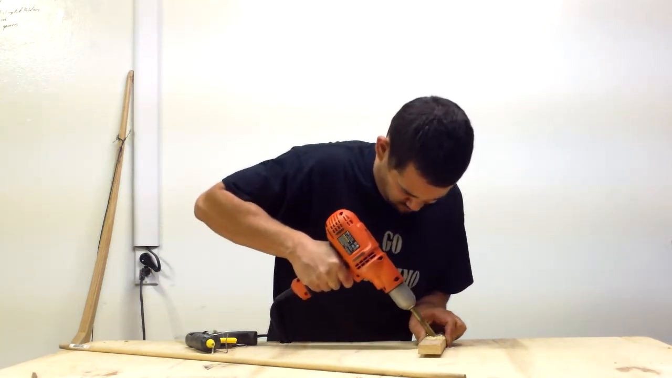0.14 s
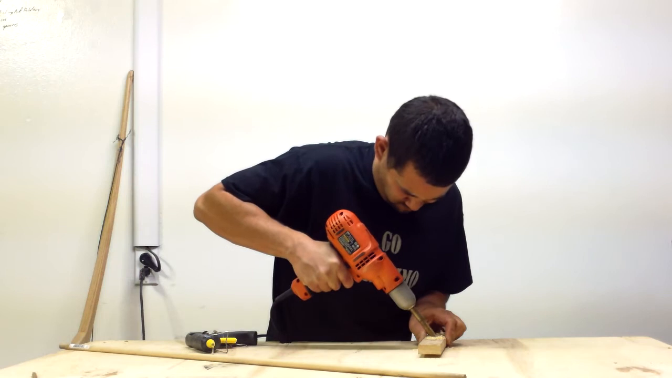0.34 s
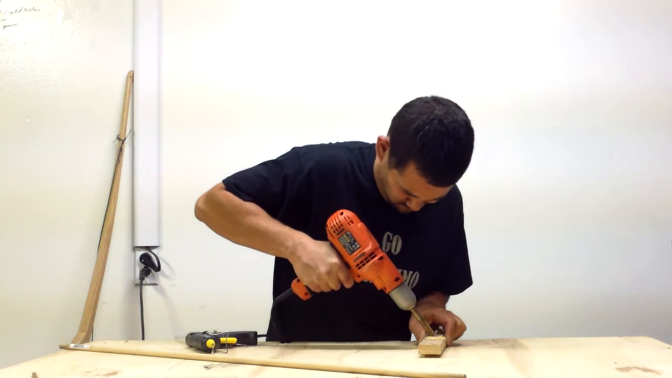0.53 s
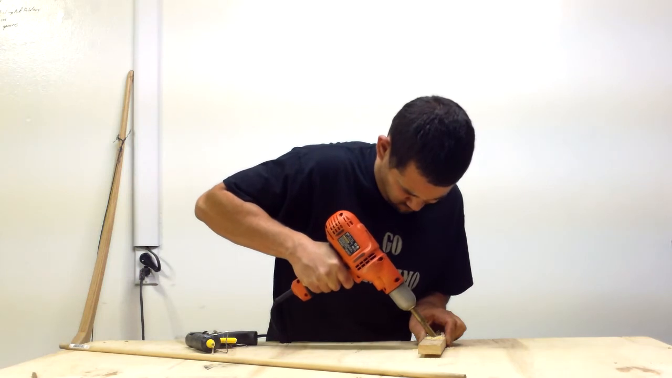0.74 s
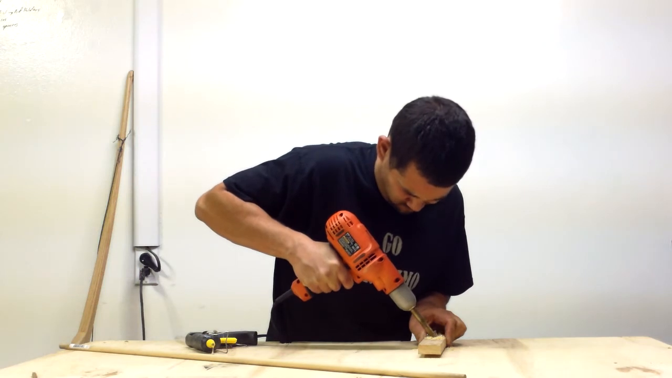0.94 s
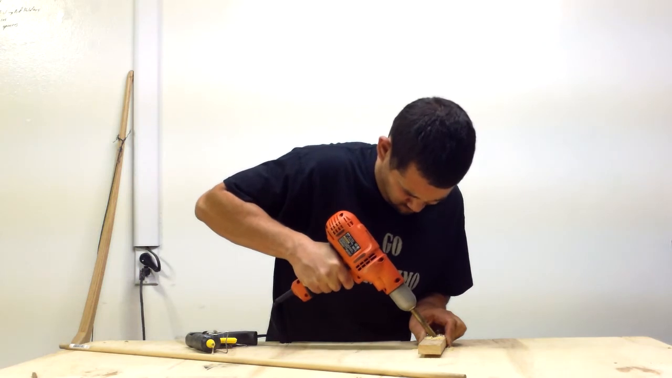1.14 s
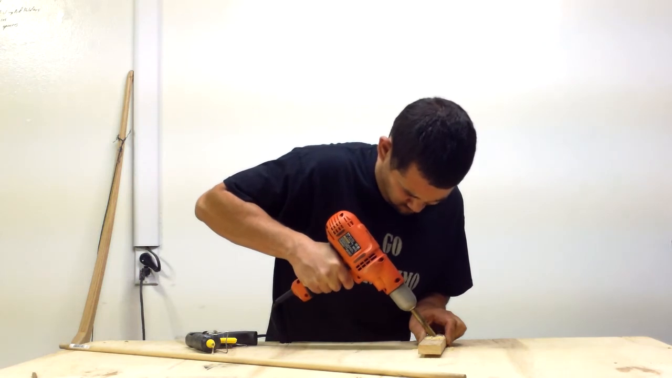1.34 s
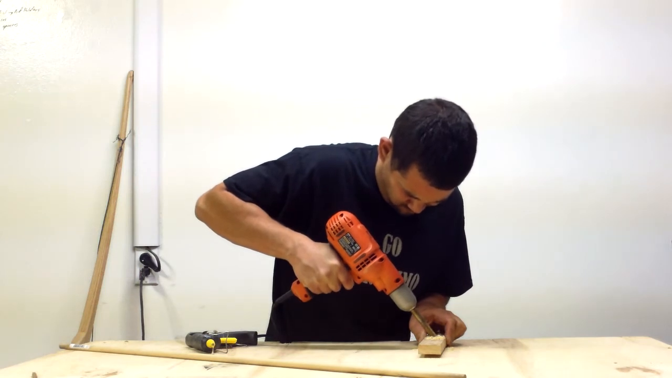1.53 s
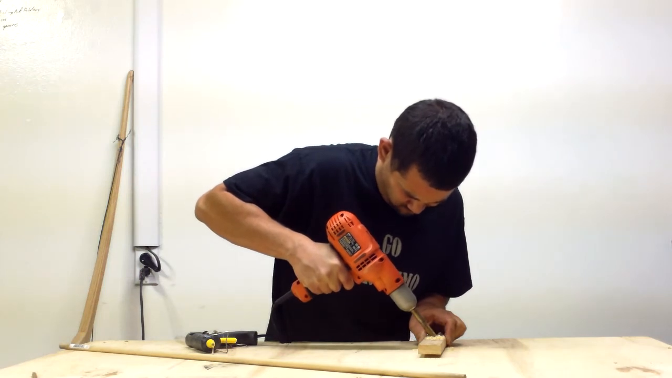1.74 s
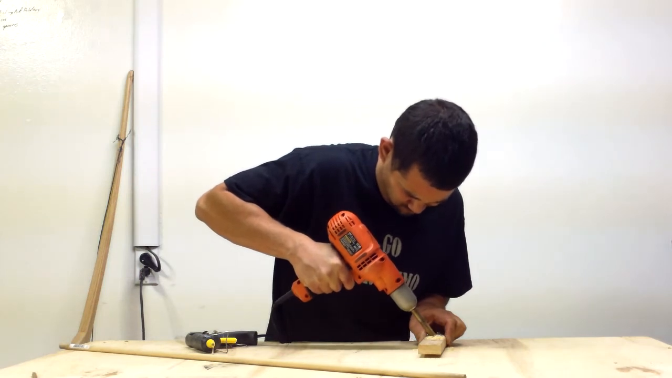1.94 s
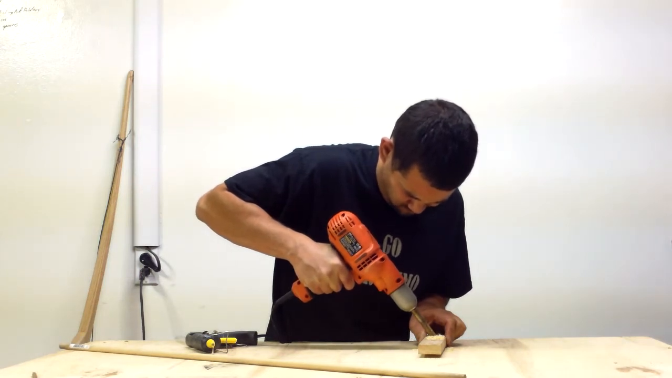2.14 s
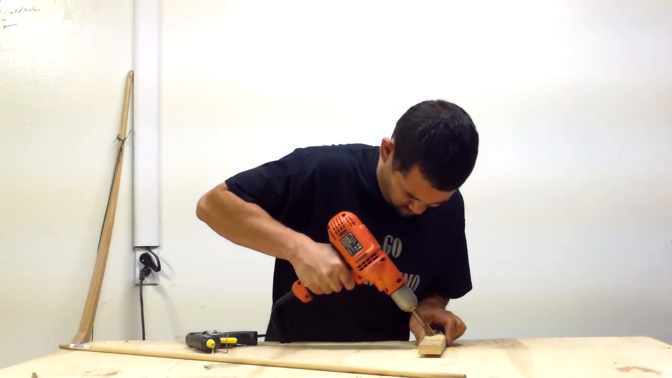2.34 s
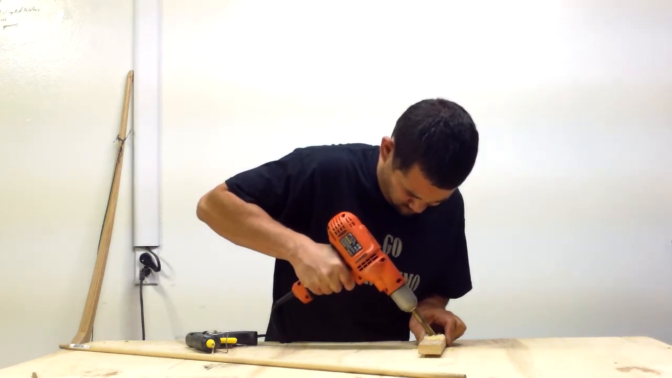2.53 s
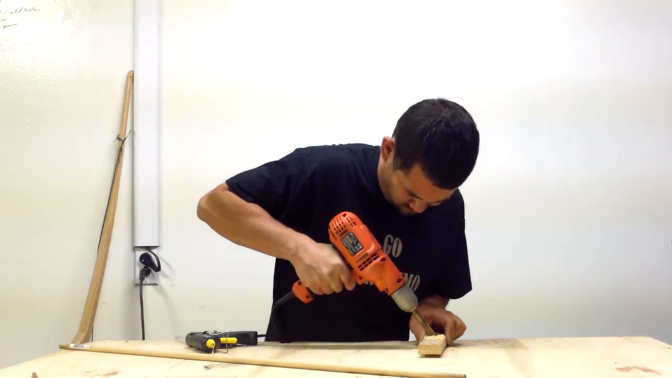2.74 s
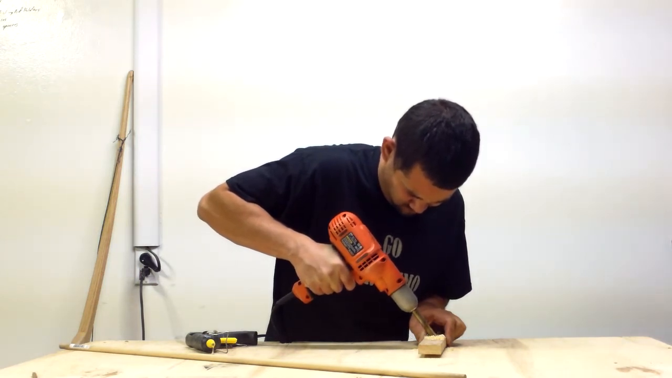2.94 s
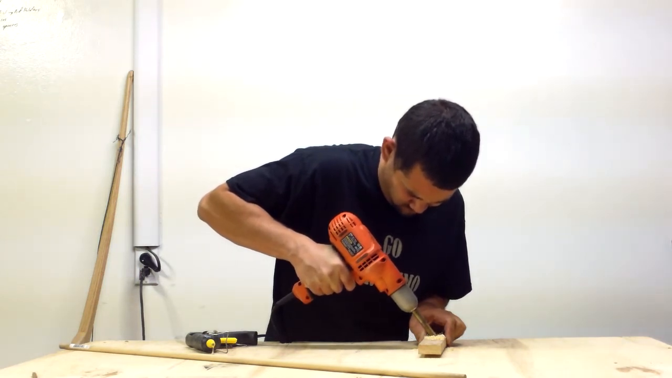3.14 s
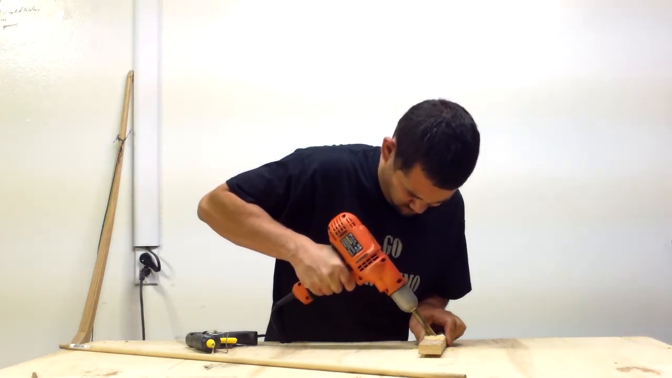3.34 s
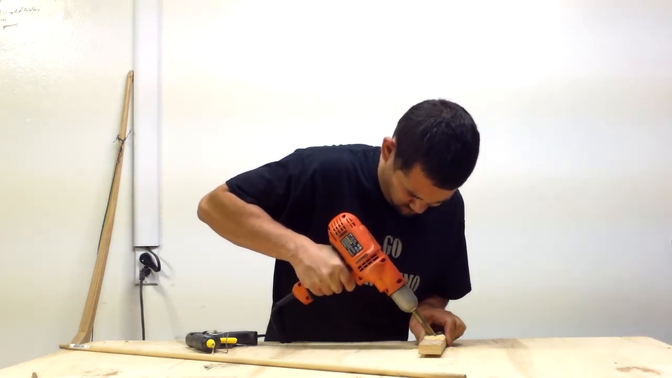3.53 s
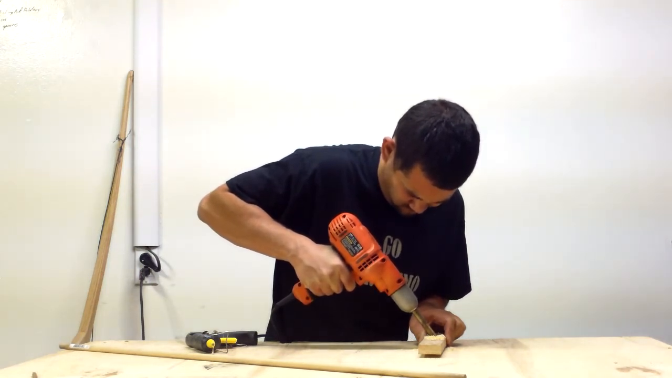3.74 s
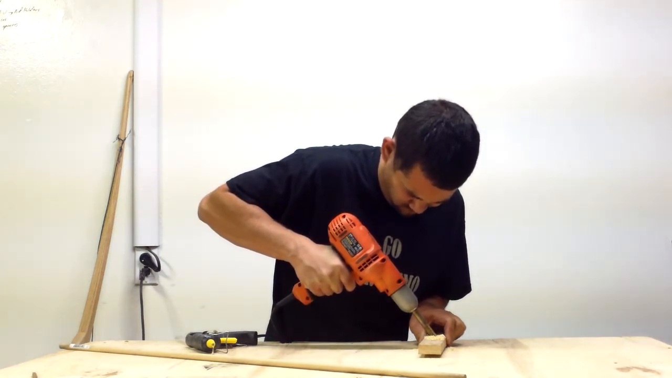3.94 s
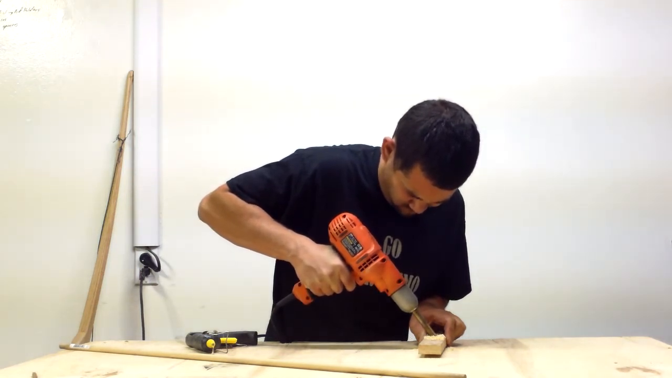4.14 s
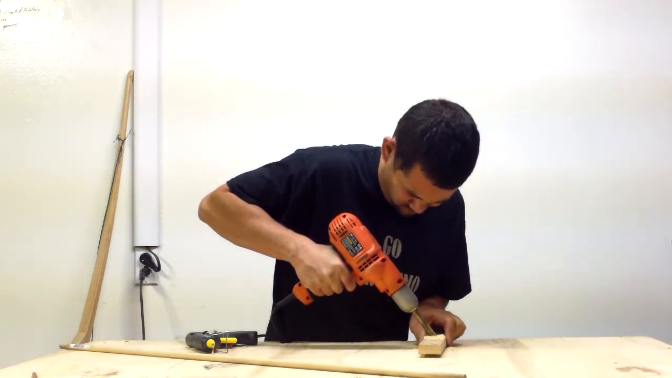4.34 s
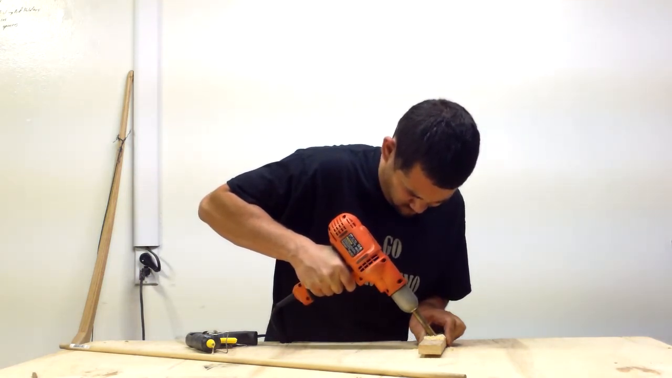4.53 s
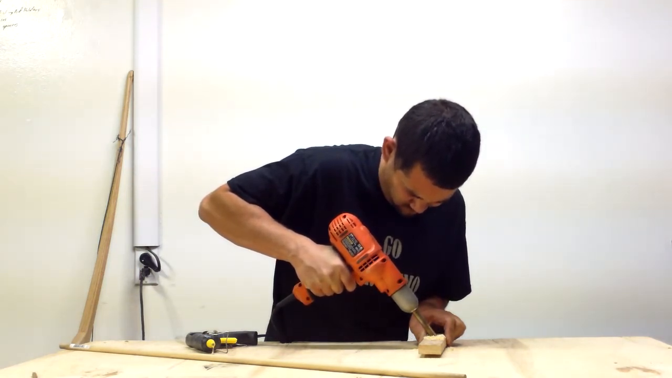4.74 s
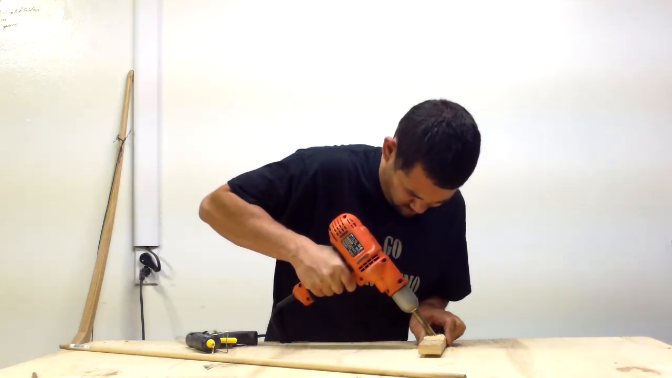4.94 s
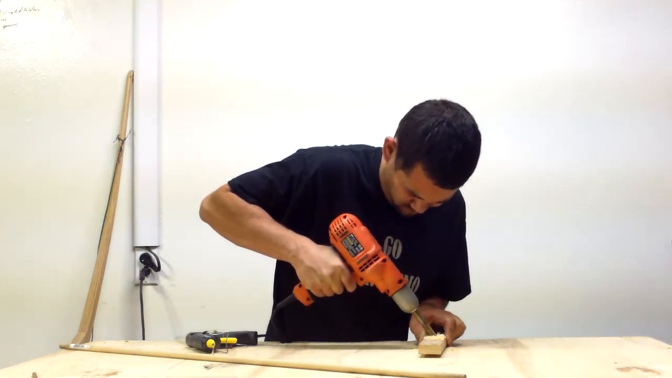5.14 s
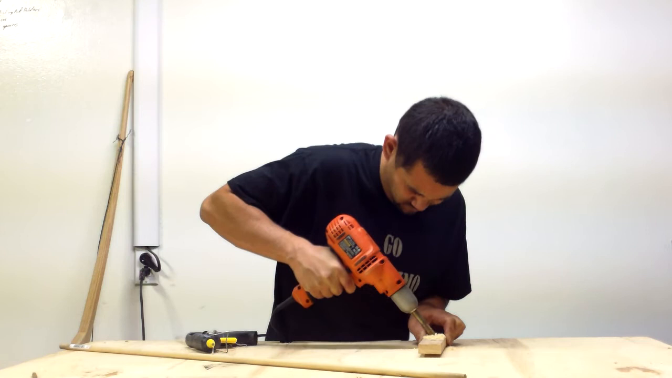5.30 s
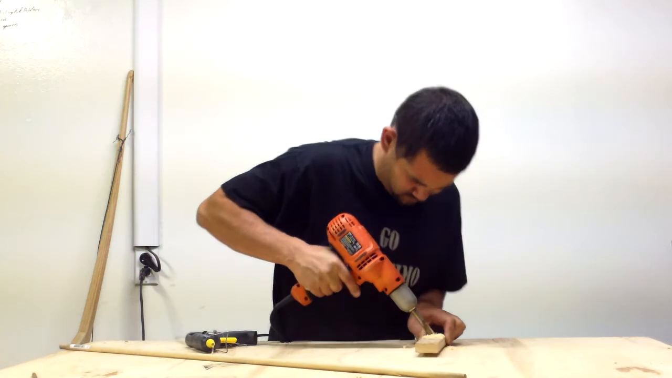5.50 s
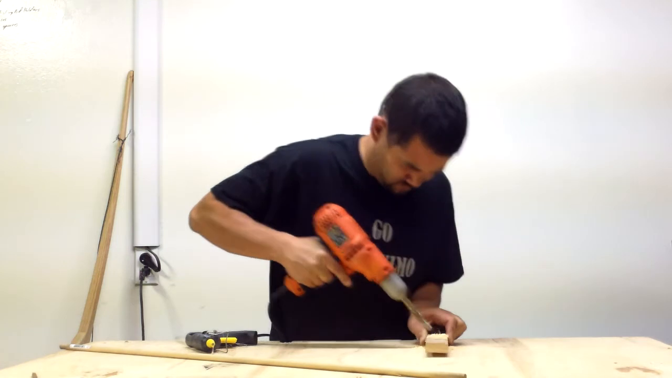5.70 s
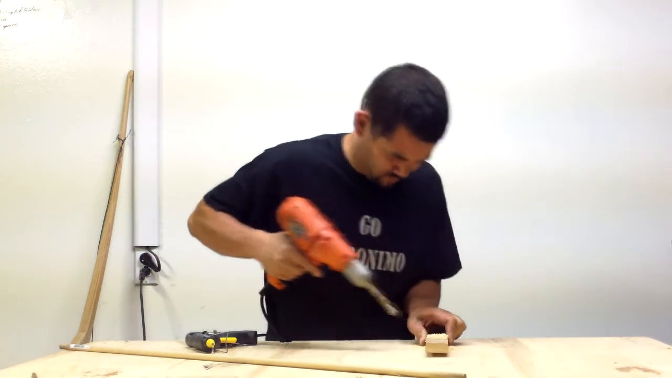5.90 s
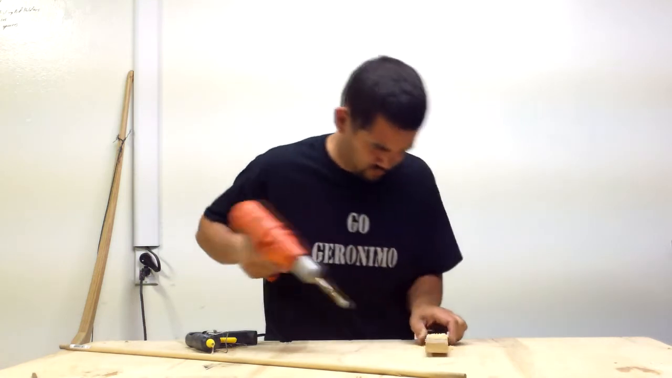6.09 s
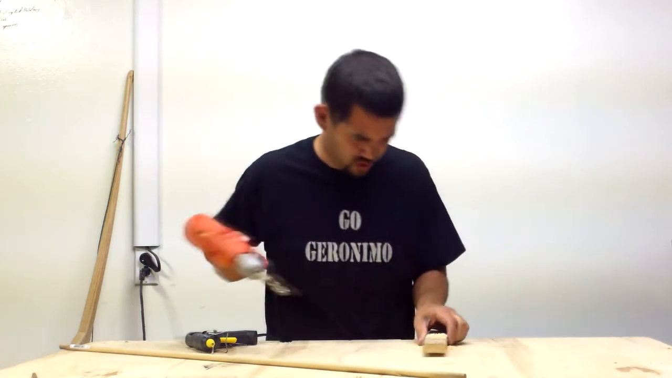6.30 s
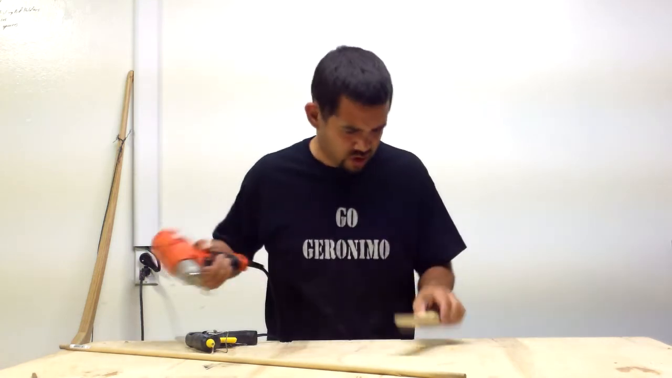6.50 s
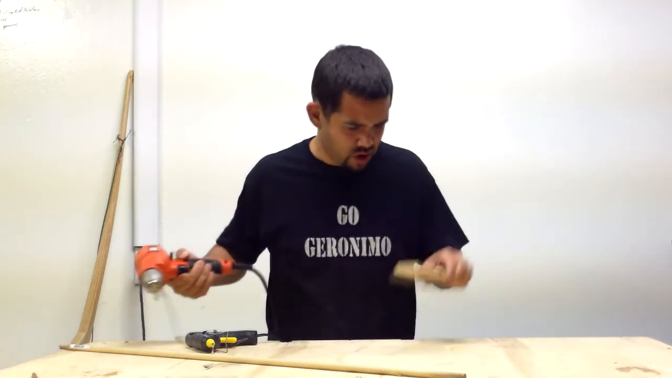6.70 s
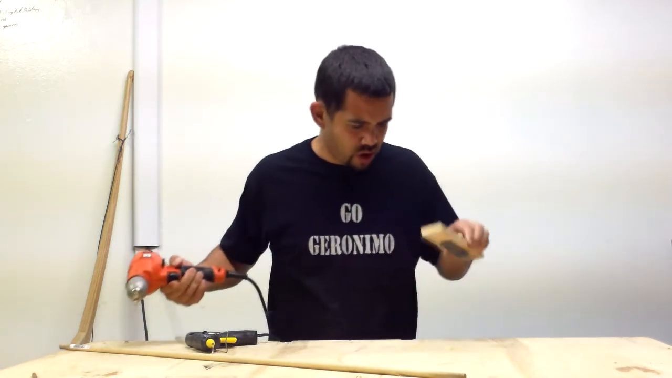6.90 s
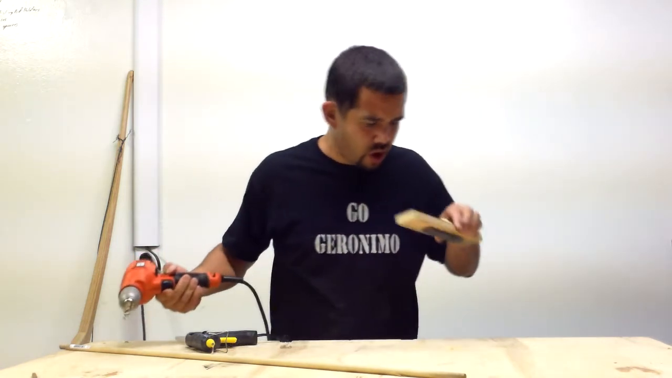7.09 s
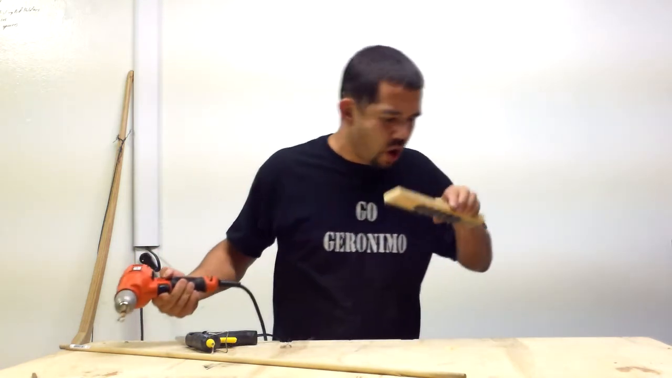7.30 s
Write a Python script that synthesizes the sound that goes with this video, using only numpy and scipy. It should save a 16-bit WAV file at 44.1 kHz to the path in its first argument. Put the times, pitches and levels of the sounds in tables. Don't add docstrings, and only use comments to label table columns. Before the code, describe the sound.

A corded power drill whines steadily and harshly while boring into wood, then is released and coasts down with a falling, rattling whir.

```python
import sys
import numpy as np
from scipy import signal
from scipy.fft import rfft, irfft, next_fast_len
from scipy.io import wavfile
from scipy.ndimage import uniform_filter1d

SR = 44100
rng = np.random.default_rng(int(sys.argv[2]) if len(sys.argv) > 2 else 0)


def put_to_file(sound):
    columns = np.atleast_2d(sound).T
    safe = np.clip(columns, -1, 1)
    whole_steps = np.round(safe * 32767)
    wavfile.write(sys.argv[1], SR, whole_steps.astype(np.int16))


def to_linear_factor(level_db):
    exponent = np.asarray(level_db, float) / 20
    return 10 ** exponent


N = 324135

GEAR_RATIO = 10.8
COAST_S = 5.485
RELEASE_S = 5.54
IDLE_PER_S = 270

# start_s, level_db
NEARNESS_DB = [(0, 1.5), (.1, 0), (1.6, 0.5), (2.45, 0), (2.9, 0), (3.7, -1), (4.95, .8), (5.3, -2),
               (5.69, 1.5), (5.81, -0.5), (6.14, 1), (6.5, 0), (6.86, -1), (7.1, -2.5), (7.27, -6),
               (7.35, -9.5)]


def in_time(rows):
    s, *columns = np.transpose(rows)
    return [np.interp(np.arange(N) / SR, s, c) for c in columns]


def swells(rows):
    t = np.arange(0, N, 64) / SR
    s, half, *columns = np.transpose(rows)
    bells = np.exp(-.5 * ((t[:, None] - s) / half) ** 2)
    return [np.interp(np.arange(N) / SR, t, bells @ c) for c in columns]


def rms_one(x):
    return x / np.sqrt(np.mean(x ** 2) + 1e-20)


def drift(rate_hz):
    r = np.exp(-2 * np.pi * rate_hz / SR)
    noise = rng.standard_normal(N + SR)
    settled = signal.lfilter([1], [1, -2 * r, r * r], noise)[SR:]
    return rms_one(settled)


def colour(x, spectrum):
    hz, level_db = np.transpose([(20, -90)] + list(spectrum))
    size = next_fast_len(N)
    log_hz = np.log(np.arange(size // 2 + 1) * SR / size + 1)
    gain = to_linear_factor(np.interp(log_hz, np.log(hz), level_db))
    return rms_one(irfft(rfft(x, size) * gain, size)[:N])


def resonance(x, hz, width_hz):
    r = np.exp(-np.pi * width_hz / SR)
    zeros = np.array([1, 0, -1]) * (1 - r * r) / 2
    return signal.lfilter(zeros, [1, -2 * r * np.cos(2 * np.pi * hz / SR), r * r], x)


def modes(x, table):
    total = 0
    for k, (hz, width_hz, level_db) in enumerate(table):
        total = total + (-1) ** k * to_linear_factor(level_db) * rms_one(resonance(x, hz, width_hz))
    return rms_one(total)


def rotor_speed():
    # start_s, speed_per_s
    boring_speed = [(0, 269.9), (.2, 273.8), (.45, 276.1), (.63, 275), (.85, 266.6), (1.08, 257.6),
                    (1.32, 257), (1.75, 261.5), (2.27, 257.8), (2.52, 243.8), (2.85, 257.2), (3.1, 260.3),
                    (3.55, 277.3), (4.0, 282), (4.68, 286.4), (5.03, 282.3), (5.27, 269.8), (5.485, 272)]
    friction_per_s2, wood_drag_per_s, wood_drag_s, crawl_per_s = 118, 44, .12, 55
    off = np.maximum(np.arange(N) / SR - COAST_S, 0)
    driven = uniform_filter1d(in_time(boring_speed)[0], size=4001)
    left = driven - friction_per_s2 * off - wood_drag_per_s * (1 - np.exp(-off / wood_drag_s))
    crawl = crawl_per_s * np.minimum(off, 1)
    return (np.maximum(left, 0) ** 4 + crawl ** 4) ** .25


def rotor_turns():
    return np.cumsum(rotor_speed()) / SR


def slowing_db():
    return 20 * np.log10(rotor_speed() / IDLE_PER_S) * (np.arange(N) / SR > COAST_S)


def order_levels():
    # start_s, level_db
    tooth_force = [(0, -32.5), (.42, -32), (.56, -41), (.7, -28), (1.05, -32), (1.3, -29), (1.96, -29),
                   (2.1, -32.5), (2.26, -24), (2.9, -29.5), (3.25, -28.5), (3.78, -22.5), (4.1, -24),
                   (4.33, -31), (4.48, -24), (4.7, -28.5), (5.2, -23.5), (5.5, -26.5)]
    # centre_s, half_length_s, level_db
    mesh_sings = [
        (5.65, 0.032, 2.4),
    ]
    second_sings = [
        (0.083, 0.16, -13),
        (3.653, 0.21, 5),
        (5.19, 0.082, 8.5),
        (5.424, 0.085, 6.5),
    ]
    runout_sings = [
        (.84, 0.082, 9),
        (1.65, 0.22, 6.5),
        (2.65, 0.19, -12),
        (3.75, 0.29, -18),
        (5.04, .07, 17),
    ]
    fourth_sings = [
        (.78, .08, 10),
        (2.62, 0.09, 9),
        (3.4, 0.21, 6.5),
        (3.9, 0.12, 8),
        (4.34, .07, -12),
        (5.54, 0.045, 17),
        (5.64, 0.045, 9.5),
    ]
    side_sings = [
        (.2, .12, -8),
        (2.55, 0.16, -10.5),
    ]
    double_sings = [
        (.08, 0.12, 6.5),
        (.45, 0.1, 0),
        (.78, 0.088, 10.5),
        (1.12, .05, 5.5),
        (1.76, 0.11, 8),
        (2.52, 0.15, 6.5),
        (3.7, 0.12, -17),
        (5.3, 0.052, 2),
        (5.55, 0.028, 15),
    ]
    ninth_sings = [
        (.3, 0.088, -13),
        (.84, 0.03, 7),
        (1.8, .15, 4),
        (2.24, 0.1, -14),
        (2.85, .1, -10),
        (3.68, 0.054, 3),
    ]
    scream_sings = [
        (.5, 0.22, 3.5),
        (2.95, 0.23, 2.5),
        (5.6, 0.11, -11),
        (5.92, 0.12, 10),
    ]

    let_go_db, quiet_s, quiet_db, scream_loss_db_per_s, flutter_db = -5, 5.84, -53, 32, 2.0
    speed = rotor_speed()
    faster = np.clip(speed - IDLE_PER_S, -25, 25)
    unload, dead, stop_db = in_time([
        (COAST_S, 0, 0, 0), (COAST_S + 0.044, 1, 0, 0), (quiet_s - .16, 1, 0, 0), (quiet_s, 1, 1, 0),
        (7.1, 1, 2.1667, -2.9167), (7.1001, 1, 1, -6)])

    def family(level_db, sings, unload_db):
        live = level_db + swells(sings)[0] + (unload_db + flutter_db * drift(45)) * unload
        return (1 - dead) * live + dead * (quiet_db + unload_db) + stop_db

    def by_speed(level_db, slope_db):
        return level_db + slope_db * faster

    second = -49.5 + 17 * np.exp(-.5 * ((2 * speed - 552.8) / 27.6) ** 2)
    off = np.maximum(np.arange(N) / SR - COAST_S, 0)
    return (family(in_time(tooth_force)[0], mesh_sings, unload_db=0.0),
            family(second, second_sings, unload_db=-5.0),
            family(by_speed(-48, -0.46), runout_sings, unload_db=let_go_db),
            family(by_speed(-44, 0.086), fourth_sings, unload_db=3.0),
            family(by_speed(-40, -0.47), side_sings, unload_db=-15),
            family(by_speed(-34, -0.072), double_sings, unload_db=-11),
            family(by_speed(-39.5, 0.24), ninth_sings, unload_db=let_go_db),
            by_speed(-26, 0.078) + swells(scream_sings)[0] - scream_loss_db_per_s * off)


def whine(turns):
    mesh_db, second_db, runout_db, fourth_db, side_db, double_db, ninth_db, scream_db = order_levels()
    orders = {
        1: second_db - 18, 2: second_db, 2 + 1 / GEAR_RATIO: runout_db, 3: side_db - 11,
        3.5: second_db - 29.0, 4: fourth_db, 5: side_db - 4.0, 6: side_db, 7: mesh_db, 9: ninth_db,
        11: ninth_db - 0.5, 12: side_db - .1, 12.15: ninth_db - .5, 13: side_db - 5.0, 14: double_db,
        16: mesh_db - 14.5, 17: mesh_db - 17.5, 18: mesh_db - 25, 21: double_db - 9.5, 28: scream_db - 12,
        30: mesh_db - 17, 33: ninth_db - 10, 34: mesh_db - 11, 35: scream_db, 36: mesh_db - 10,
        42: scream_db - 18, 49: side_db - 9}
    chuck = 2 * np.pi * turns / GEAR_RATIO
    slack, = in_time([(5.47, .004), (5.53, .012), (5.7, .012), (5.76, .007)])
    angle = 2 * np.pi * (turns + slack * drift(60) + .005 * np.sin(chuck))
    out = 0
    for order, level_db in orders.items():
        flutter = to_linear_factor(1.5 * drift(24) + 1.7 * np.cos(chuck + order))
        tone = np.sin(order * angle + rng.uniform(0, 2 * np.pi))
        out = out + np.sqrt(2) * to_linear_factor(level_db) * flutter * tone
    return out


def shop(x, t60_s):
    size = next_fast_len(N + SR)
    w = 2 * np.pi * np.arange(size // 2 + 1) / size
    lags = (rng.uniform(.02, .05, 8) * SR).astype(int)
    loops = [to_linear_factor(-60 * lag / SR / t60_s) * np.exp(-1j * w * lag) for lag in lags]
    echoes = sum(g / (1 - g) for g in loops)
    return irfft(rfft(x, size) * echoes, size)[:N]


def scrub(turns, depth, grain_db):
    beat = 1 + depth * np.cos(2 * np.pi * turns) + 0.067 * np.cos(2 * np.pi * turns / GEAR_RATIO)
    return rng.standard_normal(N) * beat * to_linear_factor(grain_db * drift(35))


def housing(turns):
    # freq_hz, level_db (per Hz)
    ring_spectrum = [(4000, -28), (6800, -10.5), (7530, -15), (8490, -5), (8750, -1), (9280, 3.5),
                     (9620, 5), (9960, -0.5), (11100, -15), (12500, -25), (16200, -50), (22000, -120)]
    hiss_spectrum = [(6180, -57), (10500, 0), (11400, -6), (15700, -20)]
    loaded_clatter = [(530, -4.5), (900, -11.5), (968, -0.5), (1190, -9.5), (1330, -6), (1460, -14),
                      (1900, 1), (2250, -4), (2850, 2.5), (4180, -0.5), (6140, -1.5), (7440, -16),
                      (8000, -4.5), (10400, -35), (17600, -120)]
    lifted_clatter = [(410, -34), (700, -28), (970, -10), (1040, -8.5), (1370, -7), (1980, -4.5),
                      (2660, -4), (3330, -5.5), (4250, -6.5), (6080, -8), (6590, -21), (7450, -25),
                      (8000, -9), (10400, -36), (17600, -120)]
    aside_clatter = [(410, -58), (700, -19), (1090, -11), (1400, -5.5), (2770, -5), (2890, -5.5),
                     (3960, -2.5), (5270, -7.5), (5770, -7.5), (7370, -16), (8000, -6), (10400, -27),
                     (17600, -120)]
    # freq_hz, width_hz, level_db
    gearbox_modes = [(2814, 21, -3.5), (3143, 25, 4.5), (3360, 78, -0.5)]
    # centre_s, half_length_s, level_db
    vent_hiss = [
        (6.165, .035, 4),
        (6.9, .2, 2),
    ]

    swing_s = 6.45
    near_db, = in_time(NEARNESS_DB)
    lifted, = in_time([(RELEASE_S + .22, 0), (RELEASE_S + .28, 1)])
    free, aside = in_time([(RELEASE_S, 0, 0), (RELEASE_S + 0.33, 1, 0),
                           (swing_s - .1, 1, 0), (swing_s + 0.086, 1, 1)])
    ring_db = -17.5 + near_db + 0.65 * slowing_db()
    clatter_db = -23 + near_db
    hiss_db = -34 + near_db + 0.44 * slowing_db() - 4.5 * lifted + swells(vent_hiss)[0]

    knocks = backlash(turns)
    loaded = scrub(turns, depth=0.032, grain_db=1.1)
    loose = loaded + 0.81 * knocks
    unloaded = (1 - aside) * colour(loose, lifted_clatter) + aside * colour(loose, aside_clatter)
    boring = colour(loaded, loaded_clatter) + to_linear_factor(-15.0) * modes(loaded, gearbox_modes)
    clatter = (1 - free) * boring + free * unloaded
    ring = colour(scrub(turns, depth=0.11, grain_db=1.2) + 0.56 * free * knocks, ring_spectrum)
    hiss = colour(scrub(turns, depth=0.13, grain_db=1.4) + 0.19 * free * knocks, hiss_spectrum)
    body = to_linear_factor(ring_db - 1.5) * ring + to_linear_factor(clatter_db + 0.15) * clatter + to_linear_factor(hiss_db + 4.0) * hiss
    return body + chuck_rattle(loose) + vent_whistle(loose)


def bench(turns):
    # freq_hz, level_db (per Hz)
    torn_fibres = [(120, -7), (200, -12.5), (259, 1), (389, -14), (485, -36), (545, -2), (642, -13.5),
                   (971, -13), (1470, -9), (2000, -10), (2600, -24), (4400, -120)]
    free_whirr = [(76, -49), (130, -29), (214, -10), (250, -15), (318, -9.5), (427, 2.5), (506, -0.5),
                  (599, -3.5), (1100, -1.5), (1430, -4), (2420, -120)]
    # freq_hz, width_hz, level_db
    boom_modes = [(250.1, 6.2, 1), (288, 15, -2.5), (214.6, 37, -11.5), (539, 13, -16.5)]
    hum_modes = [(153.5, 2.7, -2.5), (188, 25, -1.5)]
    # centre_s, half_length_s, boom_db, hum_db
    bit_catches = [(.27, .06, -12, -3), (.46, 0.1, 7.5, 1.5), (.74, 0.039, -6, 6), (.9, 0.089, -0.5, 3),
                   (1.5, .35, 1.5, 4), (2.03, 0.074, 5, 0), (2.25, 0.034, 9, 7), (2.46, .03, 9, 7),
                   (2.75, 0.061, -1.5, 6.5), (2.91, 0.024, 10, 7), (3.08, 0.053, 7, 0),
                   (3.45, 0.13, 6.5, -3), (4.2, 0.15, -7, 4), (4.75, 0.24, -0.5, 2.5), (5.0, 0.055, 6.5, 3),
                   (5.38, 0.054, -8, 5)]

    withdraw_s, withdraw_takes_s = 5.5, .13
    near_db, = in_time(NEARNESS_DB)
    catch_db, hum_catch_db = swells(bit_catches)
    out, = in_time([(withdraw_s, 0), (withdraw_s + withdraw_takes_s, 1)])
    boom_db = (1 - out) * (-36 + catch_db) + out * -59
    hum_db = (1 - out) * (-44 + hum_catch_db) + out * (-76 + near_db)
    lifted, = in_time([(RELEASE_S + 0.046, 0), (RELEASE_S + 0.33, 1)])
    whirr_db = -34 + near_db + 0.17 * slowing_db()
    cutting_db = (1 - lifted) * (-29 + 0.16 * hum_catch_db) + lifted * whirr_db

    bite = 1 + 0.053 * np.cos(2 * np.pi * turns / GEAR_RATIO)
    tearing = rng.standard_normal(N) * bite * to_linear_factor(2.8 * drift(34))
    new_chuck_turn = np.diff(np.floor(turns / GEAR_RATIO), prepend=0) > 0
    thuds = rms_one(new_chuck_turn * to_linear_factor(1.6 * drift(36))) * (1 - lifted)
    cutting = (1 - lifted) * to_linear_factor(-4.5) * colour(tearing, torn_fibres)
    cutting = cutting + lifted * to_linear_factor(-6.5) * colour(tearing, free_whirr)
    boom = to_linear_factor(boom_db - .1) * modes(tearing + 1.6 * thuds, boom_modes)
    hum = to_linear_factor(hum_db - .1) * modes(tearing + 4 * thuds, hum_modes)
    stiff = signal.butter(3, 125, "high", fs=SR, output="sos")
    return signal.sosfilt(stiff, boom + hum + to_linear_factor(cutting_db) * cutting)


def rumble():
    # centre_s, half_length_s, level_db
    handling = [
        (5.7, .12, 2),
        (5.96, .06, 6),
        (6.5, 0.23, 8.5),
        (7.15, .22, 9),
    ]
    # freq_hz, level_db (rms)
    mains_hum = [(242.2, -60)]
    level_db = -56.5 + .8 * drift(6.6) + swells(handling)[0]
    band = signal.butter(3, [30, 120], "band", fs=SR, output="sos")
    low = signal.sosfilt(band, rng.standard_normal(N))
    hum = 0
    for hz, hum_db in mains_hum:
        hum = hum + np.sqrt(2) * to_linear_factor(hum_db) * np.sin(2 * np.pi * hz * np.arange(N) / SR)
    return to_linear_factor(level_db + 2.4) * rms_one(low) + hum


def backlash(turns):
    new_turn = np.diff(np.floor(turns + .15 * drift(80)), prepend=0) > 0
    knocks = new_turn * to_linear_factor(2.2 * drift(200))
    r = np.exp(-1 / (0.0062 * SR))
    return rms_one(signal.lfilter([1], [1, -r], knocks + 1e-18) * rng.standard_normal(N))


def chuck_rattle(loose):
    # freq_hz, width_hz, level_db
    chuck_modes = [(1400, 18, -12), (2300, 26, -6), (2660, 30, -2), (2840, 30, 1), (3050, 30, -4)]
    # centre_s, half_length_s, level_db
    chuck_facing = [
        (6.2, .05, 2),
        (6.15, .1, 6),
        (6.17, .1, 7),
        (6.34, .14, 7),
        (5.9, .09, 9),
    ]
    # start_s, level_db
    rattle_level = [(5.75, -60), (5.82, -33), (6.0, -31), (6.08, -29), (6.25, -27.5), (6.44, -28),
                    (6.49, -60)]
    rings = 0
    for (hz, width_hz, level_db), facing in zip(chuck_modes, chuck_facing):
        swell = to_linear_factor(level_db + swells([facing])[0])
        rings = rings + swell * rms_one(resonance(loose, hz, width_hz))
    return to_linear_factor(in_time(rattle_level)[0] - 9) * rings


def vent_whistle(loose):
    # start_s, level_db
    vent_level = [(6.11, -60), (6.135, -27), (6.2, -29), (6.26, -31), (6.4, -27), (6.52, -26), (6.62, -28),
                  (6.75, -50)]
    # freq_hz, width_hz, level_db
    vent_modes = [(10100, 430, 6), (12200, 1800, -16)]
    return to_linear_factor(in_time(vent_level)[0]) * modes(loose, vent_modes)


def chirps():
    # centre_s, half_length_s, level_db (over silence at -72 dB)
    sleeve_chirps = [
        (6.15, .012, 35),
        (6.235, .025, 43),
    ]
    tone = np.sin(2 * np.pi * np.cumsum(1400 + 8 * drift(15)) / SR)
    return to_linear_factor(-72 + swells(sleeve_chirps)[0]) * tone


def scene():
    turns = rotor_turns()
    tones = whine(turns)
    walls = to_linear_factor(-19) * shop(tones, t60_s=.35)
    return (tones + walls + housing(turns) + bench(turns) + rumble() + chirps())[None]


def top_cut(x):
    return signal.sosfilt(signal.butter(12, 15830, fs=SR, output="sos"), x)


def record(dry):
    mix = 0.91 * np.tanh(dry / 0.92)
    return top_cut(mix)


dry = scene()
out = record(dry)
put_to_file(out)
```